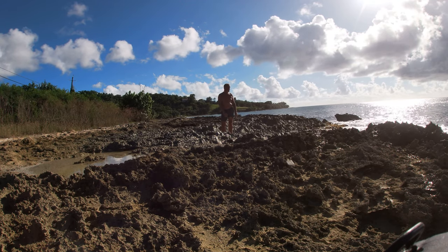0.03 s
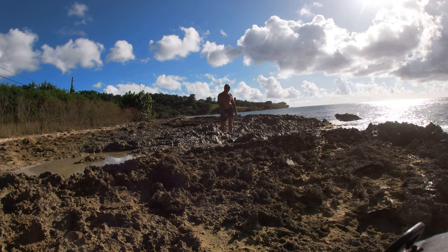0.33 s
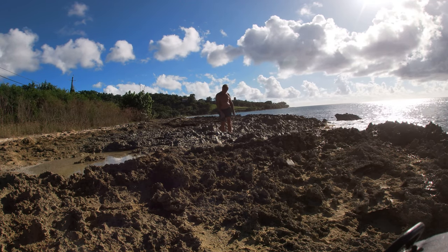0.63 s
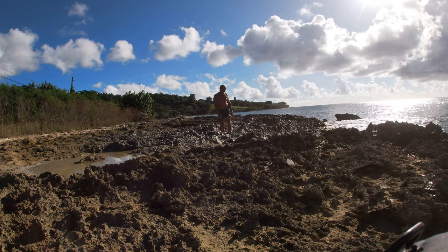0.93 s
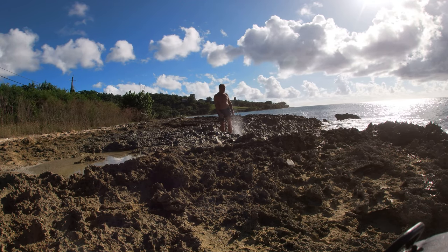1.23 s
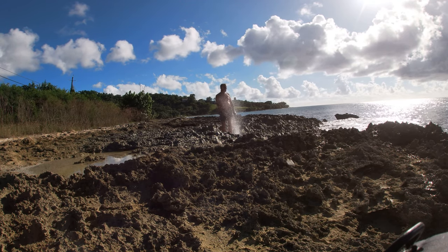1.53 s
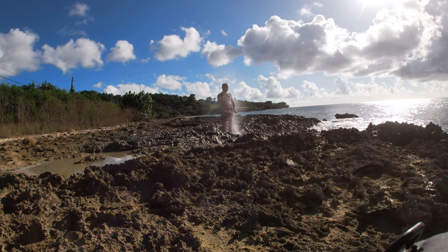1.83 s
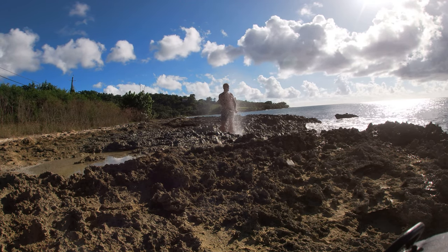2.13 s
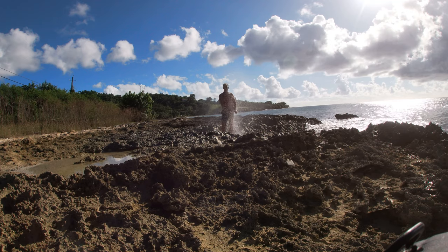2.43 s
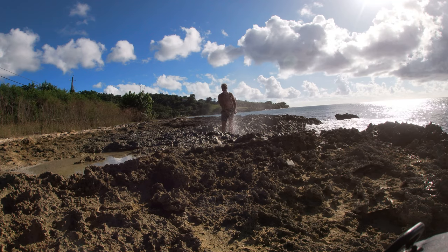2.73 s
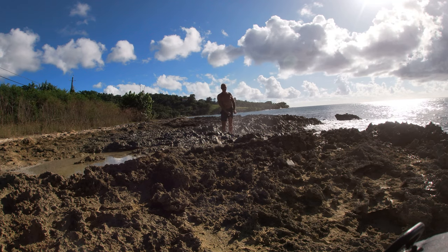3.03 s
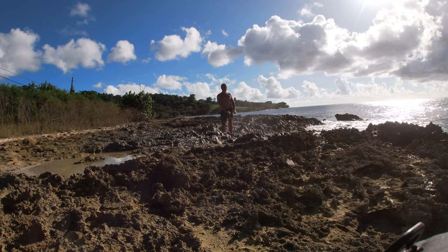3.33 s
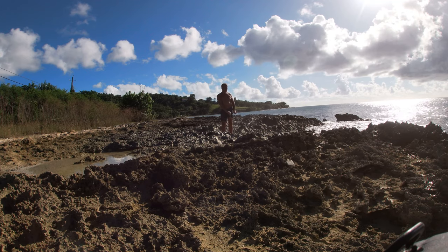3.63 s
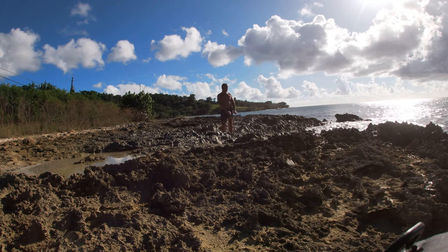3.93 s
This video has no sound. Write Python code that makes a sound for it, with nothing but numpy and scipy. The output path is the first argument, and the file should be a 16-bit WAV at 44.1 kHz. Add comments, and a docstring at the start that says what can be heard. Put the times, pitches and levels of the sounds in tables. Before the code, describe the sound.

A blowhole on a rocky shore gives soft, hollow puffs of air for the first 1.5 seconds, while wind rumbles and thumps on the microphone over steady surf. Then it swells into a hollow, gurgling roar with deep gulps, strongest from about 2.3 to 3.4 seconds. Spray hisses and drops patter on the rock, peaking around 2.7 seconds. Wind buffets again near 3.5 seconds as the roar eases slightly.

```python
"""A rocky shore, some metres from a blowhole, over steady surf.
Air sighs in and out of the hole; then a wave forces it through the rock throat, where turbulence
and the resonance of the cavity make a hollow, gurgling roar. A plume of spray hisses and its drops
patter on the rock. Wind rumbles on the microphone and buffets it now and then."""
import sys
import numpy as np
from scipy import signal
from scipy.fft import rfft, irfft
from scipy.io import wavfile
from scipy.ndimage import uniform_filter1d

SR = 44100
rng = np.random.default_rng(int(sys.argv[2]) if len(sys.argv) > 2 else 0)


def transcribe(signal):
    """Save signal, clipped to [-1, 1], as a 16-bit WAV file at the path in sys.argv[1]."""
    frames = np.atleast_2d(signal).T
    limited = np.clip(frames, -1, 1)
    pcm = np.round(limited * 32767).astype(np.int16)
    wavfile.write(sys.argv[1], SR, pcm)


N = 176400
T = np.arange(N) / SR


def amp(db):
    """Amplitude ratio of a level in decibels."""
    return 10 ** (np.asarray(db) / 20)


def unit(x):
    """Normalisation to rms 1."""
    return x / np.sqrt(np.mean(x ** 2) + 1e-20)


def curve(points):
    """Linear interpolation between (time_s, value) points."""
    return np.interp(T, *np.transpose(points))


def colour(x, spectrum):
    """Spectral shaping by (frequency_hz, level_db) points; rms 1."""
    hz, db = np.transpose(spectrum)
    gain_db = np.interp(np.log(np.fft.rfftfreq(N, 1 / SR) + 1), np.log(hz), db)
    return unit(irfft(rfft(x) * amp(gain_db), N))


def wander(rate_hz):
    """Slow random fluctuation: low-passed noise of rms 1."""
    lowpass = np.exp(-(np.fft.rfftfreq(N, 1 / SR) / rate_hz) ** 2)
    return unit(irfft(rfft(rng.standard_normal(N)) * lowpass, N))


def churn(depth_db, bins, frames):
    """Noise, amplitude-modulated in random patches of frequency and time."""
    framing = dict(nperseg=512, noverlap=384)
    spectra = signal.stft(rng.standard_normal(N), **framing)[2]
    patches = uniform_filter1d(rng.standard_normal(spectra.shape), bins, axis=0)
    patches = unit(uniform_filter1d(patches, frames, axis=1))
    return signal.istft(spectra * amp(depth_db * patches), **framing)[1][:N]


def resonate(x, hz, width_hz):
    """A steep resonance whose centre frequency follows the curve hz; rms 1."""
    carrier = np.exp(2j * np.pi * np.cumsum(hz) / SR)
    pole = np.exp(-np.pi * width_hz / SR)
    baseband = signal.lfilter([(1 - pole) ** 2], [1, -2 * pole, pole * pole], x / carrier)
    return unit((carrier * baseband).real)


def tone_bursts(rows, wobble):
    """Sinusoids under Gaussian envelopes, each gliding and wavering in pitch."""
    out = np.zeros(N)
    for centre, length, hz, glide, db in rows:
        octaves = glide * np.clip(T - centre, -length, length)
        cycles = np.cumsum(hz * 2 ** octaves * np.exp(wobble * wander(rate_hz=69.4))) / SR
        envelope = amp(db) * np.exp(-(2 * (T - centre) / length) ** 2)
        out += envelope * np.sin(2 * np.pi * cycles)
    return out


# Spectrum of the surf: frequency_hz, level_db
SURF_SPECTRUM = [(20, -20), (150, 0), (300, 0), (650, -1.5), (950, -8), (1450, -9), (2350, -18),
                 (3100, -17.5), (4500, -28.5), (5700, -32.5), (7000, -50), (9500, -54), (12500, -59),
                 (14000, -78)]
# Strength of the surf: time_s, level_db
SURF_LEVEL = [(0, -40), (.5, -37.5), (1.0, -38), (1.09, -35), (1.25, -38), (1.45, -38), (1.7, -36),
              (4, -36)]


def surf():
    """Incoherent addition: many waves along the shore sum to an even wash of noise."""
    envelope = amp(curve(SURF_LEVEL) + 0.3 * wander(rate_hz=17))
    return envelope * colour(churn(depth_db=0.1, bins=7, frames=25), SURF_SPECTRUM)


# Puffs of air through the hole: start_s, length_s, first_hz, last_hz, level_db
AIR_PUFFS = [(0, 0.19, 300, 483, -36), (0.13, 0.29, 390, 603, -39), (.92, 0.39, 860, 680, -45),
             (1.2, 0.44, 596, 360, -37), (3.545, .42, 657, 534, -37.5)]


def sighs():
    """Resonance excited by airflow: hollow puffs slide in pitch as the water moves in the hole."""
    out = np.zeros(N)
    for start, length, first_hz, last_hz, db in AIR_PUFFS:
        progress = np.clip((T - start) / length, 0, 1)
        hz = first_hz + (last_hz - first_hz) * progress
        envelope = amp(db) * np.sqrt(abs(np.sin(np.pi * progress)))
        out += envelope * resonate(rng.standard_normal(N), hz, width_hz=270)
    return out


# Spectrum of the wind rumble: frequency_hz, level_db
WIND_SPECTRUM = [(5, -10), (22, 1), (34, 2), (60, -0.5), (100, -5), (170, -11), (300, -21.5), (800, -47),
                 (3000, -88.5)]
# Strength of the rumble: time_s, level_db
WIND_LEVEL = [(0, -44), (.23, -34.5), (.42, -29), (.55, -29.5), (.7, -32.5), (.84, -34), (.92, -32),
              (1.2, -33), (1.39, -36), (1.47, -51), (1.8, -49), (1.9, -42), (2.03, -38), (2.18, -38.5),
              (2.6, -39.5), (2.82, -38.5), (3.1, -48.5), (3.4, -35), (3.56, -25.5), (3.68, -35.5),
              (3.85, -31), (4, -36)]
# Eddies striking the microphone: centre_s, length_s, pitch_hz, glide_octaves_per_s, peak_db
EDDIES = [(.331, .024, 84.1, -7.5, -23), (.49, 0.008, 70.4, -1.5, -24), (.597, 0.041, 42.2, 1, -15.5),
          (.686, 0.023, 70, 0.5, -24.5), (.832, 0.028, 50, 0, -23.5), (.868, 0.033, 159.5, 26, -25.5),
          (1.091, 0.011, 202, -21, -25), (1.115, 0.028, 74, -1, -16.5), (1.23, 0.018, 64.3, 1.5, -24),
          (1.257, 0.045, 91, -0.5, -19), (1.91, 0.032, 39.7, 4, -25), (2.17, .021, 76, 1, -24.5),
          (3.535, 0.026, 55, 1, -21), (3.573, 0.063, 122, -29, -21), (3.727, 0.025, 57.2, -22, -19.5)]


def wind():
    """Turbulent pressure on the microphone: an uneven rumble, with thumps from single eddies."""
    envelope = amp(curve(WIND_LEVEL) + 2.4 * wander(rate_hz=23))
    rumble = envelope * colour(rng.standard_normal(N), WIND_SPECTRUM)
    return rumble + tone_bursts(EDDIES, wobble=0.18)


# Slugs of air: centre_s, length_s, pitch_hz, glide_octaves_per_s, peak_db
AIR_SLUGS = [(.08, 0.07, 376.2, 5.5, -35.5), (.124, 0.0138, 570, 8, -25.5), (.21, 0.055, 440, 3, -34),
             (.224, 0.0089, 540, -0.5, -29.5), (1.51, .025, 359.4, -13, -27.5),
             (1.605, 0.024, 410, -0.5, -27.5), (1.68, 0.029, 190.1, 5, -27), (1.735, .05, 180, 0.5, -27.5),
             (1.81, .05, 212, 12, -23), (2.04, 0.029, 171, 2, -27.5), (2.125, 0.17, 172, 0, -29.5),
             (2.335, .09, 261.5, 2, -22.5), (2.463, 0.028, 280, -12, -20), (2.58, .08, 303, -2, -20.5),
             (2.667, 0.035, 188, -5, -18), (2.703, .05, 224, -14.5, -15.5), (2.76, .025, 202, -8.5, -19),
             (2.82, .05, 182.4, -13, -17), (2.857, 0.03, 220, 18.5, -16), (2.945, .05, 219, 5.5, -20.5),
             (2.985, 0.024, 315, 6.5, -18.5), (3.0, .04, 176.8, -4.5, -22.5),
             (3.033, .05, 275.6, 11.5, -20), (3.115, .1, 165.1, -1, -20.5), (3.19, 0.036, 175, -6, -19),
             (3.212, .018, 277.2, 17, -14), (3.26, 0.036, 161.3, -1.5, -22), (3.37, .07, 188.4, -15, -21),
             (3.47, 0.031, 279, 4, -23.5), (3.62, .06, 332, 1, -21), (3.698, .025, 300, -10.5, -19)]


def gulps():
    """Transient excitation: each slug of air that breaks through the water booms in the cavity."""
    return tone_bursts(AIR_SLUGS, wobble=0.1)


# Single drops near the microphone: start_s, peak_db
NEAR_DROPS = [(.678, -59), (.69, -58), (.761, -58), (1.112, -63)]
# Spectrum of their splashes: frequency_hz, level_db
TICK_SPECTRUM = [(1000, -25), (5500, 4), (7000, -9), (10000, -30), (15000, -40)]


def ticks(decay_s=0.0045):
    """Impact noise: each nearby drop makes a bright splash that decays exponentially."""
    envelope = sum(amp(db) * (T >= start) * np.exp(-abs(T - start) / decay_s) for start, db in NEAR_DROPS)
    return envelope * colour(rng.standard_normal(N), TICK_SPECTRUM)


# Turbulence in the rock throat: frequency_hz, level_db
THROAT_SPECTRUM = [(20, -32), (90, -9.5), (122, -3), (150, 2.5), (330, 3), (490, 0.5), (690, -11.5),
                   (860, -28.5), (1500, -41), (4000, -70.5)]
# Strength of the rush of air: time_s, level_db
RUSH_LEVEL = [(1.25, -51.5), (1.46, -43), (1.6, -30.5), (1.8, -33.5), (1.89, -26), (1.92, -32), (2.02, -29),
              (2.27, -28.5), (2.42, -25.5), (2.7, -26.5), (3.0, -26.5), (3.25, -26.5), (3.45, -28),
              (3.56, -30.5), (3.68, -27), (3.8, -28), (3.92, -36.5), (4, -33.5)]
# Resonant frequency of the cavity: time_s, pitch_hz
CAVITY_PITCH = [(1.4, 416), (1.57, 322), (1.67, 207), (1.82, 230), (1.89, 257), (2.04, 167), (2.15, 179),
                (2.3, 267), (2.58, 294), (2.72, 206), (3.0, 204), (3.13, 182), (3.27, 232), (3.5, 206),
                (3.65, 291), (4, 175)]
# Strength of its ringing: time_s, level_db
CAVITY_LEVEL = [(1.4, -66), (1.6, -35.5), (1.68, -30.5), (1.76, -28), (1.89, -35.5), (1.92, -61),
                (2.1, -41), (2.27, -32), (2.3, -28.5), (2.62, -28.5), (2.85, -28.5), (3.2, -27.5),
                (3.4, -28), (3.65, -39.5), (4, -31.5)]


def roar():
    """Cavity resonance: turbulent air in the throat rings a hollow tuned by the water sloshing in it."""
    rush = colour(churn(depth_db=-0.45, bins=2, frames=7), THROAT_SPECTRUM)
    hz = curve(CAVITY_PITCH) * np.exp(0.065 * wander(rate_hz=27))
    turbulence = colour(rng.standard_normal(N), THROAT_SPECTRUM)
    ringing = resonate(turbulence, hz, width_hz=187)
    return amp(curve(RUSH_LEVEL)) * rush + amp(curve(CAVITY_LEVEL)) * ringing


# Spectrum of the spray: frequency_hz, level_db
SPRAY_SPECTRUM = [(100, -13), (600, 4.5), (1000, -1.5), (1500, 0), (2350, -7), (3200, -5.5), (4500, -15.5),
                  (5700, -24.5), (7000, -33), (9500, -34.5), (11000, -43.5), (12600, -36.5), (15000, -49)]
# Strength of the plume: time_s, level_db
PLUME_LEVEL = [(1.2, -61), (1.5, -48), (1.62, -47), (1.7, -43.5), (1.88, -42.5), (2.15, -39), (2.4, -35.5),
               (2.62, -36), (2.85, -36.5), (3.02, -39.5), (3.4, -39.5), (3.65, -41.5), (4, -45)]


def spray():
    """Broadband jet noise: the plume hisses as it is driven out of the hole."""
    hiss = colour(churn(depth_db=1.02, bins=9, frames=16), SPRAY_SPECTRUM)
    return hiss * amp(curve(PLUME_LEVEL) + 0.51 * wander(rate_hz=13))


# Spectrum of a drop landing on rock: frequency_hz, level_db
DROP_SPECTRUM = [(300, -20.5), (1200, -2), (2400, -3), (3300, 0.5), (4500, -5), (5800, -8.5), (7000, -31),
                 (9500, -35), (11000, -32.5), (12600, -24), (15000, -35.5)]
# Strength of the falling spray: time_s, level_db
PATTER_LEVEL = [(0, -80), (1.5, -76.5), (2.0, -61), (2.7, -46), (3.5, -50.5), (4, -54)]


def patter(drops_per_s=1700, spread_db=0.5):
    """Shot noise: drops from the plume strike the rock at independent random instants."""
    sizes = amp(spread_db * np.minimum(rng.exponential(1, N), 5))
    signs = rng.choice([-1, 1], N)
    landings = rng.random(N) < drops_per_s / SR
    return amp(curve(PATTER_LEVEL)) * colour(sizes * signs * landings, DROP_SPECTRUM)


def scene():
    """Superposition: all the sources add at one spot on the rocks, in one channel."""
    return (surf() + sighs() + roar() + gulps() + spray() + patter() + wind() + ticks())[None]


def record(dry, cutoff_hz=15000):
    """Band limiting: a linear-phase low-pass filter removes the highest treble."""
    lowpass = signal.firwin(511, cutoff_hz, window=("kaiser", 9), fs=SR)
    return signal.oaconvolve(dry, lowpass[None], "same")


dry = scene()
out = record(dry)
transcribe(out)
```